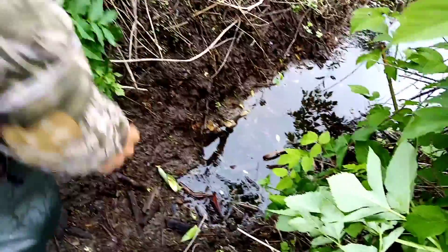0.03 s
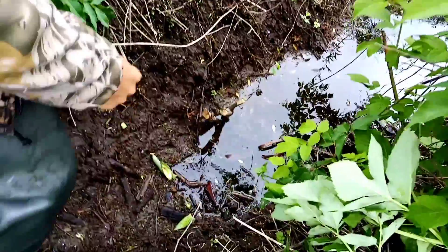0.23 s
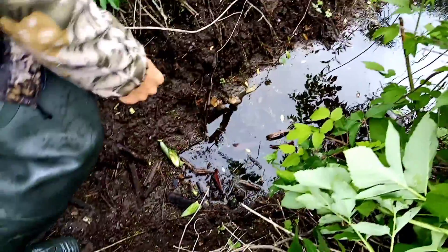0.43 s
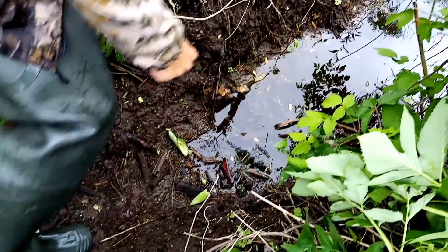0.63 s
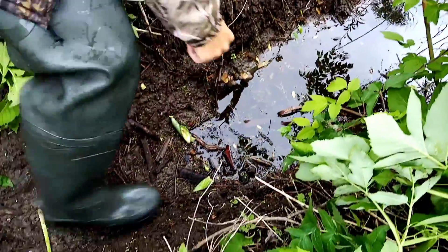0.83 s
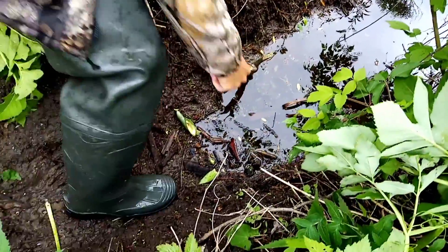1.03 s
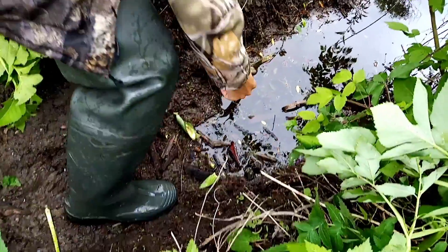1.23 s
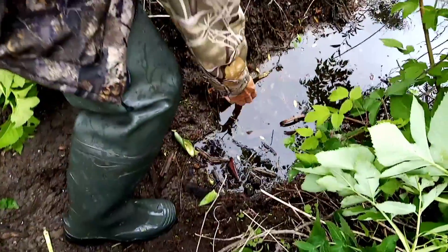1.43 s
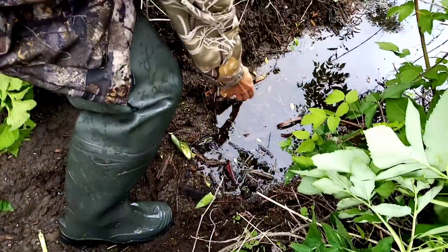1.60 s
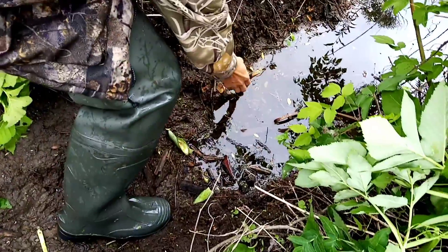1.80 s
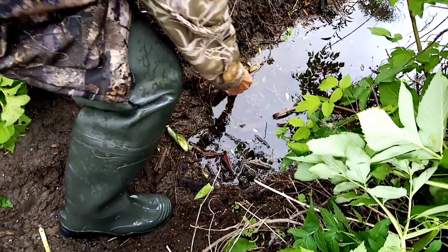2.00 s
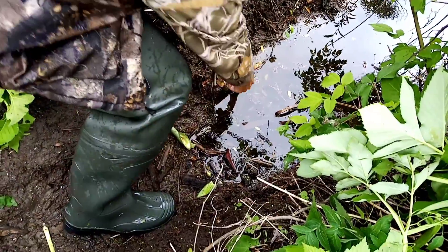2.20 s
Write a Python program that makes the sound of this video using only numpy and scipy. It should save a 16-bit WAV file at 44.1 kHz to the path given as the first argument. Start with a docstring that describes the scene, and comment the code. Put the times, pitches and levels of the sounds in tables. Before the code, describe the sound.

Footsteps in wet mud, close to the microphone. From the start a jacket rustles and rubber waders rub and faintly groan. At about 0.6 and 0.85 seconds a boot presses down with a wet crunch, snapping twigs and a dull thud. A few small snaps and a brushing rustle follow near 1.3 seconds, and clothes stir again around 2 seconds. Songbirds chirp throughout over a soft outdoor hiss.

```python
"""Someone in rubber waders steps down a muddy bank, right beside the microphone. Over a soft outdoor
hiss and low rumble, the jacket rustles, the waders rub and the boot shaft groans; songbirds begin to
whistle, smeared by the foliage. At 0.6 s and again at 0.85 s the boot crushes wet litter: twigs snap,
air pockets burst and the mud thuds. The wearer settles with a few last snaps and a brushing rustle at
1.3 s, the birds sing on, and the clothes stir again near 2 s."""
import sys
import numpy as np
from scipy import signal
from scipy.fft import rfft, irfft
from scipy.io import wavfile
from scipy.ndimage import uniform_filter1d

SR = 44100
rng = np.random.default_rng(int(sys.argv[2]) if len(sys.argv) > 2 else 0)


def log_audio(samples):
    """Write samples as a 16-bit WAV file to the path given in sys.argv[1]."""
    # one column per channel
    frames = np.atleast_2d(samples).T
    # limit to full scale, then quantise
    limited = np.clip(frames, -1, 1)
    pcm = np.round(limited * 32767).astype(np.int16)
    wavfile.write(sys.argv[1], SR, pcm)


N = 103635


def undb(db):
    """Level in decibels to amplitude ratio."""
    return 10 ** (np.asarray(db) / 20)


def unit(x):
    """Normalisation to rms 1."""
    return x / np.sqrt(np.mean(x ** 2))


def over_bins(table, column=1):
    """Interpolation of a table column over log frequency, one value per FFT bin."""
    table = np.array(table, float)
    log_hz = np.log(np.maximum(np.fft.rfftfreq(N, 1 / SR), 1))
    return np.interp(log_hz, np.log(table[:, 0]), table[:, column])


def colour(x, spectrum):
    """Minimum-phase filtering to a spectral shape; white noise keeps its power."""
    cepstrum = irfft(np.log(unit(undb(over_bins(spectrum)))), N)
    cepstrum[1:N // 2] *= 2
    cepstrum[N // 2:] = 0
    return irfft(rfft(x) * np.exp(rfft(cepstrum)), N)


def wander(rate_hz):
    """Random modulation: Gaussian steps smoothed into a curve of rms 1."""
    hold = max(int(SR / rate_hz), 2)
    steps = np.repeat(rng.standard_normal(N // hold + 1), hold)
    return unit(uniform_filter1d(uniform_filter1d(steps, hold), hold)[:N])


def grains(per_s, spread_db=0):
    """Shot noise: independent clicks of uneven size, rms 1."""
    size = rng.standard_normal(N) * undb(spread_db * np.minimum(rng.exponential(size=N), np.pi))
    return unit(size * (rng.random(N) < per_s / SR))


# the two microphone ports (frequency [Hz], left minus right [dB], coherence [0-1])
PORT_RESPONSE = [(61.6, 7, 0.67), (350, 8.5, 0.9), (850, 10.5, 0.64), (1250, 3.5, 0.43), (2500, 14.5, 0),
                 (4240, 6.5, 0), (6730, 7.5, 0.2), (7820, 1, 0.3), (12000, 0.5, 0), (15000, -6, .7)]
def ports(source, spectrum, lag_s=0.001079):
    """Acoustic shadow: sound from the left reaches the right port late, shaded and partly scattered."""
    left, scattered = colour(source(), spectrum), colour(source(), spectrum)
    coherence = np.clip(over_bins(PORT_RESPONSE, column=2), 0, 1)
    right = coherence * rfft(left) + np.sqrt(1 - coherence ** 2) * rfft(scattered)
    shadow = undb(-over_bins(PORT_RESPONSE))
    delay = np.exp(-2j * np.pi * np.fft.rfftfreq(N, 1 / SR) * lag_s)
    return np.array([left, irfft(right * shadow * delay, N)])


# soft outdoor hiss and rumble, the treble cut off above 7 kHz (frequency [Hz], relative level [dB])
BACKGROUND_SPECTRUM = [(25, -31), (60, -6), (105, 3), (160, -6.5), (200, -6.5), (270, -16.5), (550, -8.5),
                       (800, -10), (1200, -7), (1700, -4.5), (2150, -16.5), (3000, -4.5), (3800, -2),
                       (5000, -4), (6600, -5.5), (7250, -45), (7800, -58), (8600, -48), (15000, -39)]
def outdoors():
    """Background noise: rumble and hiss under slight, slow amplitude modulation."""
    noise = lambda: rng.standard_normal(N) * undb(0.8 * wander(rate_hz=6.76))
    return undb(-51) * ports(noise, BACKGROUND_SPECTRUM, lag_s=0.000524)


def foliage(x, decay_s):
    """Multiple scattering: leaves and trunks return a decaying tail, uncorrelated between the ports."""
    t = np.arange(SR) / SR
    tail = rng.standard_normal((2, SR)) * np.exp(-t / decay_s) * (1 - np.exp(-t / 0.0073))
    tail /= np.sqrt(np.sum(tail ** 2, axis=1, keepdims=True))
    return signal.fftconvolve(x, tail, axes=1)[:, :N]


def whistle(t, jitter, at, length, first_hz, middle_hz, last_hz, db, pan_db, rasp):
    """A tone glides through three pitches; random frequency and amplitude modulation make it rasp."""
    out, on = np.zeros((2, N)), (t > at) & (t < at + length)
    progress = (t[on] - at) / length
    glide = np.polyfit([0, .5, 1], [first_hz, middle_hz, last_hz], 2)
    hz = np.polyval(glide, np.sin(np.pi * progress / 2) ** 2) * (1 + rasp * jitter[0, on])
    swell = np.sin(np.pi * progress) ** 0.56  # a power under 1 holds the note's strength longer
    flutter = 1 + 13.6 * rasp * jitter[1, on]
    tone = np.sqrt(2) * np.sin(2 * np.pi * np.cumsum(hz) / SR)
    out[:, on] = undb([[db], [db - pan_db]]) * swell * flutter * tone
    return out


# thin rising notes that open a phrase (time [s], level [dB])
RISING_NOTES = [(.925, -45.5), (1.369, -48), (1.778, -49.5)]
# bird notes, plus a brief high rustle at 1.92 s (time [s], duration [s], start pitch [Hz],
# middle pitch [Hz], end pitch [Hz], level [dB], left minus right [dB], rasp [share of pitch],
# relative echo level [dB])
NOTES_AND_RUSTLE = [(0.156, 0.1, 2515, 2527, 2437, -48, 19, 0.0091, -3),
                    (0.457, 0.024, 4710, 3774, 4970, -42, 14, 0.011, -12),
                    (0.729, 0.051, 3800, 3414, 2780, -44.5, 22, 0.042, -6),
                    (0.81, 0.039, 3950, 3670, 3450, -51, 22, 0.009, -10),
                    (0.856, 0.049, 3700, 3740, 3700, -45, 9.5, 0.0026, -2),
                    (.85, 0.15, 3440, 3415, 3280, -48, 21, 0.0065, -1),
                    (0.956, 0.0385, 4800, 5290, 5230, -38.5, 9.5, .014, -9),
                    (0.978, 0.062, 3650, 3162, 2766, -44, 28.5, 0.04, -4),
                    (1.028, 0.041, 3590, 3186, 2800, -43, 19, 0.029, -12),
                    (1.11, 0.036, 3417, 3126, 2600, -45.5, 28, 0.018, -9),
                    (1.199, 0.056, 4280, 4110, 3950, -48, 11.5, 0.022, -11),
                    (1.236, 0.057, 4020, 3860, 3650, -39.5, 13.5, 0.033, -5.5),
                    (1.336, 0.079, 5250, 5177, 5140, -43.5, 7, 0.002, 4),
                    (1.43, 0.12, 5200, 5195, 5190, -52, 4, 0.0028, -10),
                    (1.407, 0.013, 5030, 4944, 5230, -33.5, 9, 0.012, -4.5),
                    (1.414, 0.063, 3450, 3183, 2840, -43, 31, 0.0089, -6.5),
                    (1.47, 0.064, 3850, 3658, 3600, -38.5, 16, 0.0077, -4),
                    (1.6, 0.2, 2517, 2540, 2570, -43.5, 21.5, 0.0026, -8.5),
                    (1.68, 0.011, 5980, 5880, 5900, -45.5, 12, 0.005, -30),
                    (1.802, 0.037, 4930, 5057, 4960, -43, 10, 0.008, -6),
                    (1.82, 0.064, 3350, 3114, 2810, -43, 20, 0.0078, -4),
                    (1.919, 0.021, 6200, 6210, 6300, -45, 7, 0.015, -4),
                    (1.925, 0.082, 3380, 3546, 3620, -49, 30, 0.014, -14),
                    (2.046, 0.046, 3634, 3385, 3300, -46.5, 26, 0.022, 1),
                    (2.091, 0.11, 4135, 4100, 4020, -55.5, 9, 0.04, 6.5),
                    (2.15, 0.049, 2736, 2700, 2575, -49.5, 21, 0.03, -0.5),
                    (2.234, 0.024, 3864, 3675, 3450, -49, 11, 0.038, 6),
                    (2.322, 0.02, 5330, 5000, 4850, -48, 19, 0.053, -8)]
def birds(t):
    """Reverberation: song and one brief rustle reflect early from leaves and echo longer from trees."""
    jitter = np.array([wander(rate_hz=490), wander(rate_hz=980)])
    rise_s, rise_hz = 0.059, (5600, 6360, 6800)
    direct = sum(whistle(t, jitter, at, rise_s, *rise_hz, db, pan_db=14, rasp=0.0087)
                 for at, db in RISING_NOTES)
    to_trees = undb(-9) * direct
    for *shape, echo_db in NOTES_AND_RUSTLE:
        sound = whistle(t, jitter, *shape)
        direct += sound
        to_trees += undb(echo_db) * sound
    return direct + undb(-10) * foliage(direct, decay_s=0.012) + foliage(to_trees, decay_s=0.093)


# movement of the clothes (time [s], jacket level [dB], wader level [dB])
MOVEMENTS = [(0, -44, -52), (.1, -54, -47.5), (.2, -52, -53), (.32, -46, -48.5), (.40, -47.5, -50),
             (.46, -47, -46), (.53, -49.5, -52), (0.662, -39, -50), (.76, -49.5, -48), (.92, -45.5, -49),
             (1.031, -43.5, -51.5), (1.098, -51.5, -59.5), (1.22, -51, -61), (1.288, -46.5, -54),
             (1.36, -53.5, -54.5), (1.48, -55, -57), (1.619, -67.5, -63.5), (1.86, -57, -61),
             (1.941, -49, -62.5), (2.062, -43.5, -54.5), (2.22, -54, -56), (2.35, -47, -55)]
# spectrum of crinkling cloth (frequency [Hz], relative level [dB])
JACKET_SPECTRUM = [(100, -21), (350, -11), (550, -18), (1000, -5.5), (2100, -4.5), (2900, -1), (3800, -0.5),
                   (5000, -1), (6600, 1.5), (7400, -12), (8400, -36), (12000, -46.5), (15300, -54.5)]
# hollow spectrum of rubbing rubber (frequency [Hz], relative level [dB])
WADER_SPECTRUM = [(80, -23), (230, -23.5), (340, -11.5), (520, -20), (780, 2.5), (1000, 5), (1220, 8),
                  (1500, -6.5), (1800, -12), (2400, -34), (6000, -52.5)]
def clothes(t):
    """Friction noise: cloth and rubber catch and slip in thousands of tiny impulses a second."""
    at, jacket_db, wader_db = np.array(MOVEMENTS).T
    rustle = undb(np.interp(t, at, jacket_db) + 0.79 * wander(rate_hz=110))
    rub = undb(np.interp(t, at, wader_db) + 1.85 * wander(rate_hz=70.27))
    jacket = ports(lambda: rustle * grains(per_s=7000, spread_db=2), JACKET_SPECTRUM)
    waders = ports(lambda: rub * grains(per_s=2700, spread_db=-0.5), WADER_SPECTRUM)
    return jacket + waders


# bends of the boot shaft (peak time [s], half width [s], level [dB])
SHAFT_BENDS = [(0.042, 0.18, -53.5), (.628, 0.019, -43.5), (0.7, 0.059, -52), (0.997, 0.023, -54)]
# resonances of the hollow boot (frequency [Hz], relative level [dB])
SHAFT_SPECTRUM = [(100, -44), (260, -12), (335, -2), (400, -8.5), (500, -12.5), (650, -6), (900, -17),
                  (3000, -54)]
def shaft(t):
    """Stick-slip excitation: bending rubber drives the hollow of the boot into a low groan."""
    bend = sum(undb(db) * np.exp(-((t - at) / half) ** 2) for at, half, db in SHAFT_BENDS)
    return ports(lambda: bend * grains(per_s=1100), SHAFT_SPECTRUM)


# twig snaps and a short brushing rustle at 1.31 s (time [s], level [dB], decay time [s])
SNAPS_AND_BRUSH = [(.229, -36.5, 0.0034), (0.5582, -32.5, 0.0028), (0.6023, -30.5, 0.0013),
                   (0.62, -30.5, 0.0056), (0.6468, -28, 0.00072), (0.8523, -26, .003),
                   (0.9298, -25.5, 0.0035), (0.9857, -31, 0.0019), (1.044, -43.5, .003),
                   (1.201, -42, 0.0038), (1.2552, -29.5, .001), (1.311, -37.5, .008)]
# their shared spectrum (frequency [Hz], relative level [dB])
TWIG_SPECTRUM = [(200, -17.5), (1000, -22), (2200, -9), (3200, -8), (4500, -5), (6500, 0), (7400, -11),
                 (8600, -33.5), (12000, -51), (15300, -56)]
def twigs(t):
    """Transient noise: bursts that decay within milliseconds are snaps; the longest is a brushing rustle."""
    bursts = sum(undb(db) * (t >= at) * np.exp(-abs(t - at) / decay) for at, db, decay in SNAPS_AND_BRUSH)
    return ports(lambda: bursts * rng.standard_normal(N), TWIG_SPECTRUM)


# short ringing sounds under the sole: wet pops, a slap at 0.85 s and a knock at 0.88 s
# (time [s], frequency [Hz], decay time [s], relative level [dB])
SOLE_RINGS = [(.593, 5180, 0.0046, -23), (.6025, 5070, .001, -21), (0.618, 5700, 0.0083, -17.5),
              (.622, 6670, 0.0038, -20.5), (0.6214, 4390, 0.0036, -17.5), (0.631, 4360, .002, -32),
              (0.646, 3360, .0013, -20.5), (.654, 6720, 0.0055, -25), (.657, 3250, .006, -31),
              (0.673, 2610, 0.0098, -31), (.677, 6220, 0.0054, -29), (0.8515, 1800, .005, -28),
              (0.852, 5460, 0.0018, -23), (.853, 6400, 0.0044, -30), (.8783, 990, 0.00076, -22.5),
              (.931, 6470, 0.0019, -28), (1.031, 1036, 0.0056, -35.5)]
# transmission through the mud (frequency [Hz], relative level [dB])
MUD_SPECTRUM = [(500, -0.5), (7000, -1.5), (8500, 1.5), (15000, -30)]
def sole_rings(t):
    """Damped resonance: wet pops, a slap and a knock each ring briefly at a wobbling pitch."""
    def rings(attack_s=0.00025):
        out = np.zeros(N)
        wobble = 1 + 0.024 * wander(rate_hz=700)
        for at, hz, decay, db in SOLE_RINGS:
            on = (t > at) & (t < at + 10 * decay)
            age = t[on] - at
            envelope = undb(db) * (1 - np.exp(-age / attack_s)) * np.exp(-age / decay)
            out[on] += envelope * np.sin(2 * np.pi * np.cumsum(hz * wobble[on]) / SR)
        return undb(-5) * out
    return ports(rings, MUD_SPECTRUM)


def small_pockets(count=800, low_hz=1240, high_hz=7410, decay_cycles=8.8):
    """Constant-Q resonance: tiny air pockets burst at random, each ringing at its own pitch; rms 1."""
    out, age = np.zeros(N + 512), np.arange(512) / SR
    for when, pitch, size in rng.random((count, 3)):
        hz = low_hz + (high_hz - low_hz) * pitch
        start = int(when * N)
        strength = undb(-6 * np.log(0.022 + size))  # many weak, a few strong
        ring = np.exp(-age * hz / decay_cycles) * np.sin(2 * np.pi * hz * age)
        out[start:start + len(age)] += strength * ring
    return unit(out[:N])


# presses of the sole (peak time [s], attack time [s], decay time [s], crunch level [dB], thud level [dB])
PRESSES = [(.603, 0.019, 0.029, -32, -45.5), (0.621, 0.0039, 0.018, -33, -55),
           (.655, 0.015, 0.018, -39, -64), (0.68, 0.014, 0.01, -51, -41.5),
           (0.852, 0.013, 0.014, -29.5, -45.5), (0.853, 0.0036, 0.016, -32.5, -36.5),
           (0.88, 0.0029, 0.015, -52, -39.5), (1.04, 0.006, 0.016, -68, -51.5)]
# spectrum of crushed wet litter (frequency [Hz], relative level [dB])
CRUNCH_SPECTRUM = [(150, -41), (500, -36), (1100, -18.5), (1700, -24), (2150, -21.5), (3000, -14),
                   (4200, -10), (5400, -7), (6600, -7.5), (7400, -17.5), (8500, -28.5), (12000, -38),
                   (14000, -43), (15300, -29)]
# spectrum of the thud in the mud (frequency [Hz], relative level [dB])
THUD_SPECTRUM = [(25, -33), (50, -21.5), (90, -0.5), (200, 5), (350, -14), (500, -11.5), (850, 9),
                 (1200, -1.5), (1750, 9.5), (2200, -6), (6000, -54)]
def boot(t):
    """Inelastic impact: each press crushes wet stalks and bursts air pockets over a dull thud of mud."""
    crunch, thud = 0, 0
    for at, attack, decay, crunch_db, thud_db in PRESSES:
        press = np.exp(-np.maximum((at - t) / attack, (t - at) / decay))
        crunch = np.hypot(crunch, press * undb(crunch_db))  # incoherent sounds add in power
        thud = np.hypot(thud, press * undb(thud_db))
    litter = ports(lambda: crunch * (grains(per_s=8300) + undb(-7) * small_pockets()), CRUNCH_SPECTRUM)
    mud = ports(lambda: thud * grains(per_s=5600, spread_db=-1), THUD_SPECTRUM)
    return litter + mud


def scene():
    """Superposition: the pressures of all sources add at each port."""
    t = np.arange(N) / SR
    return boot(t) + twigs(t) + shaft(t) + clothes(t) + birds(t) + outdoors() + sole_rings(t)


def record(dry):
    """Band limiting: a steep low-pass filter removes the highest treble."""
    cutoff_hz = 15800
    return signal.sosfilt(signal.ellip(8, .2, 70, cutoff_hz, fs=SR, output="sos"), dry)


dry = scene()
out = record(dry)
log_audio(out)
```